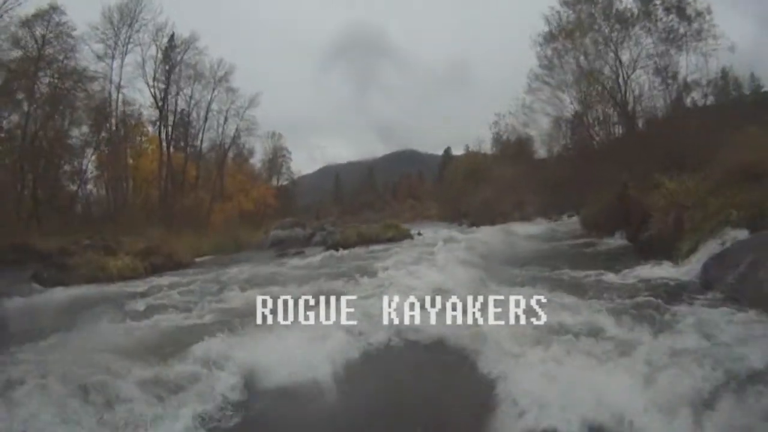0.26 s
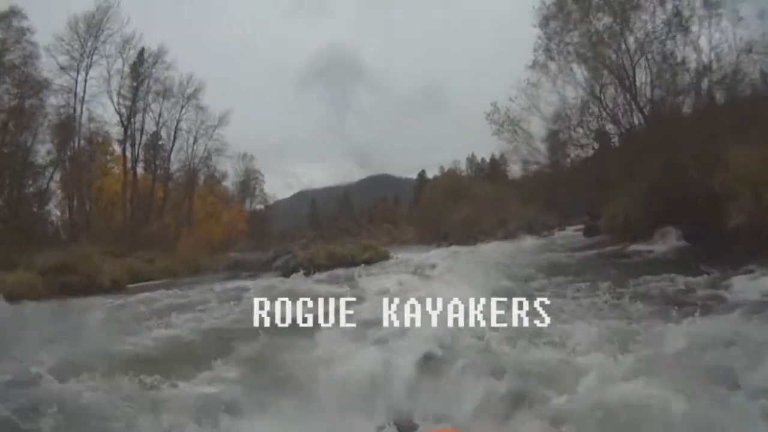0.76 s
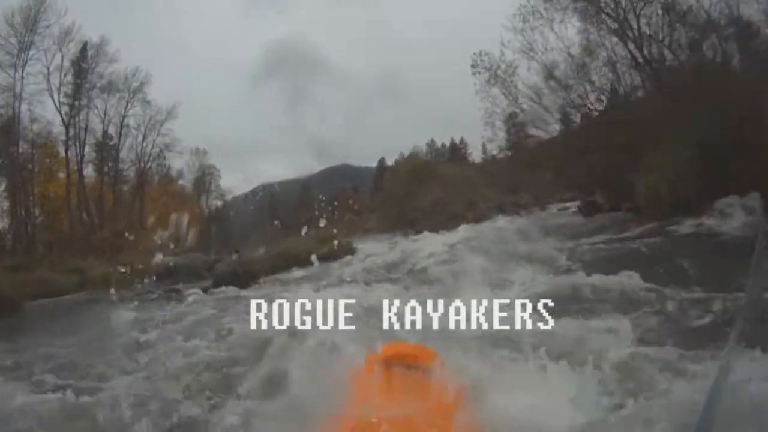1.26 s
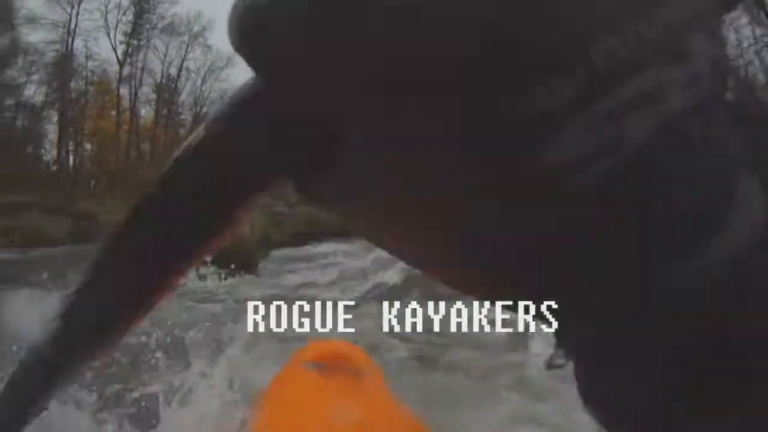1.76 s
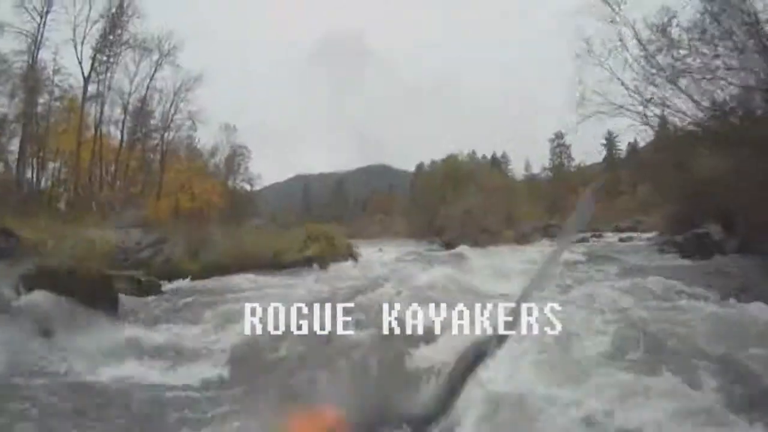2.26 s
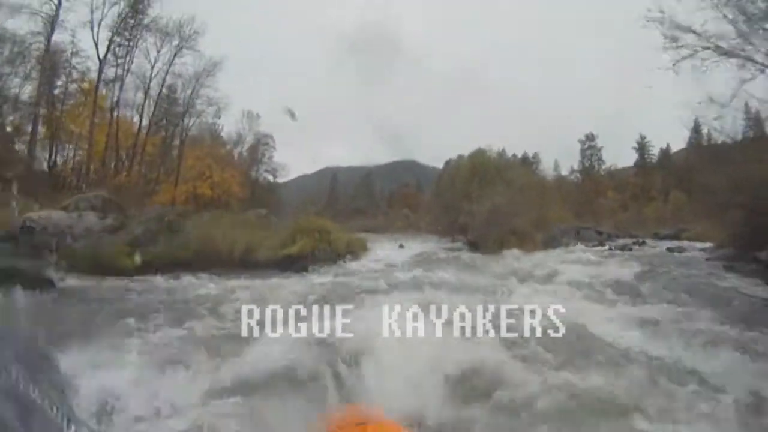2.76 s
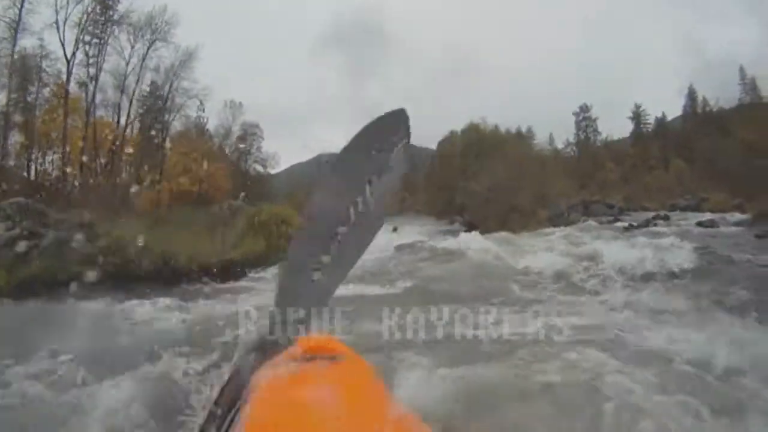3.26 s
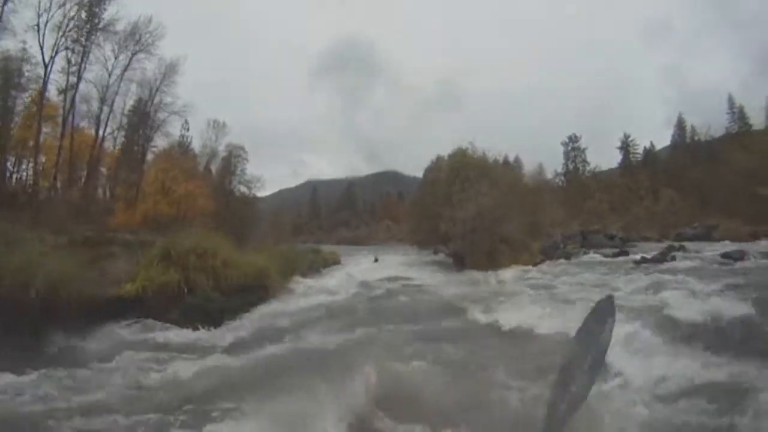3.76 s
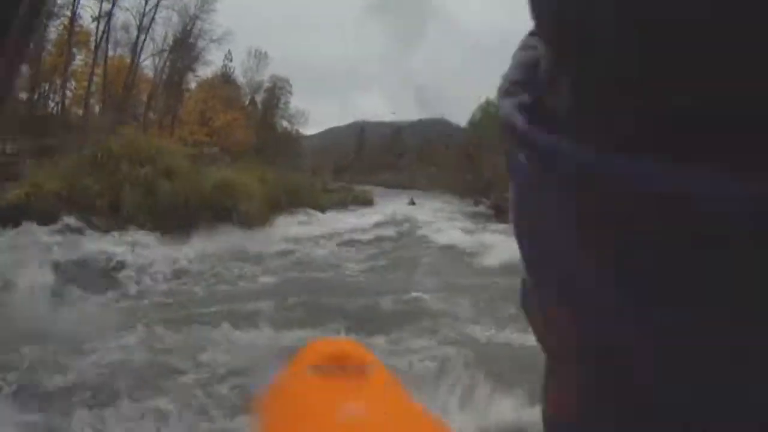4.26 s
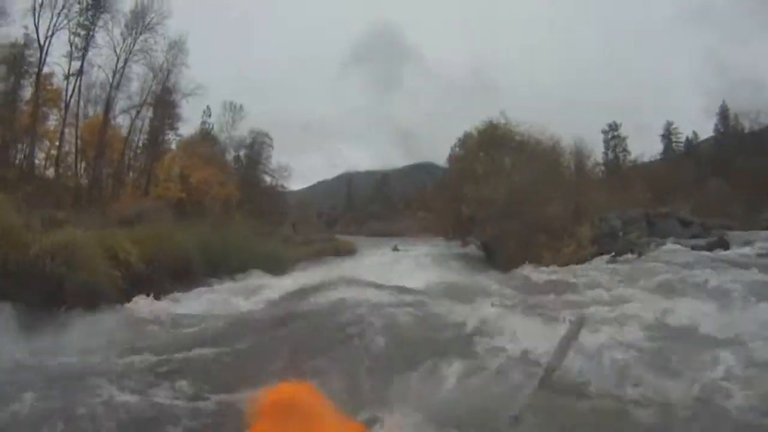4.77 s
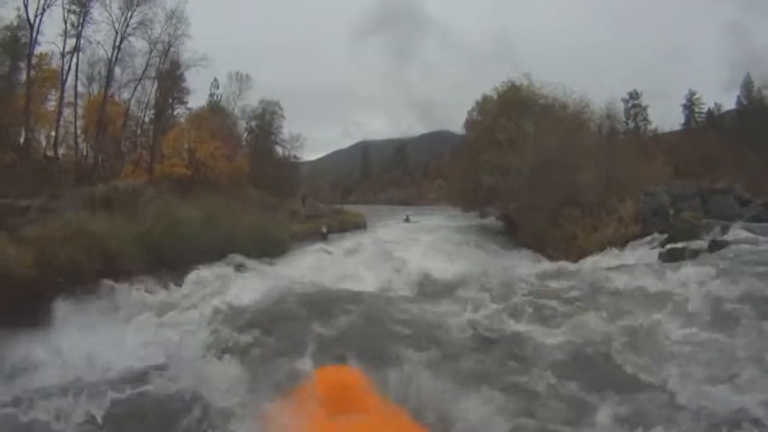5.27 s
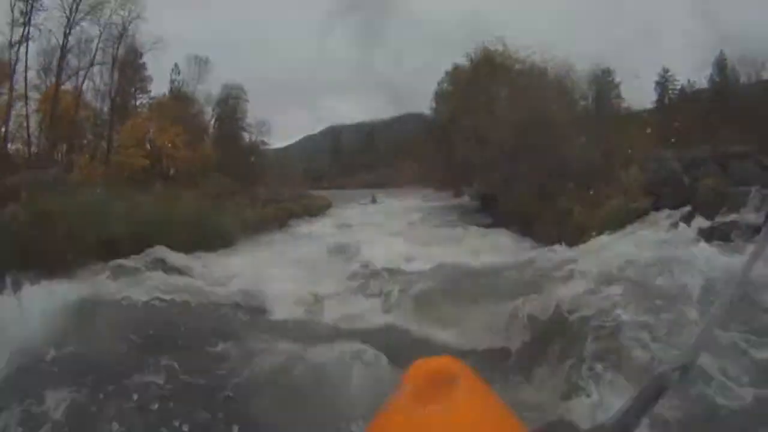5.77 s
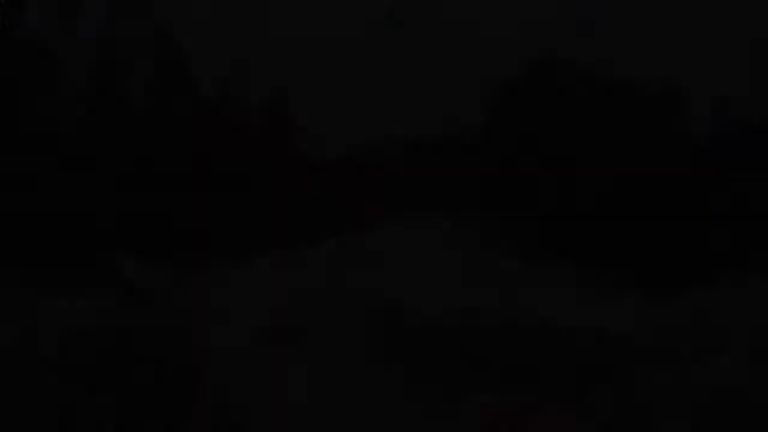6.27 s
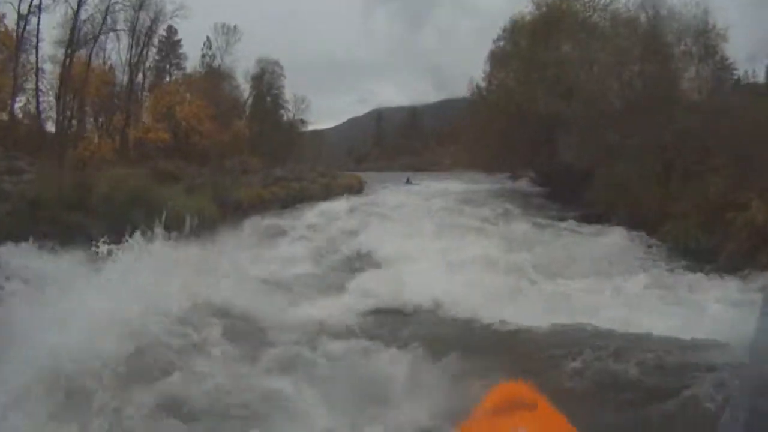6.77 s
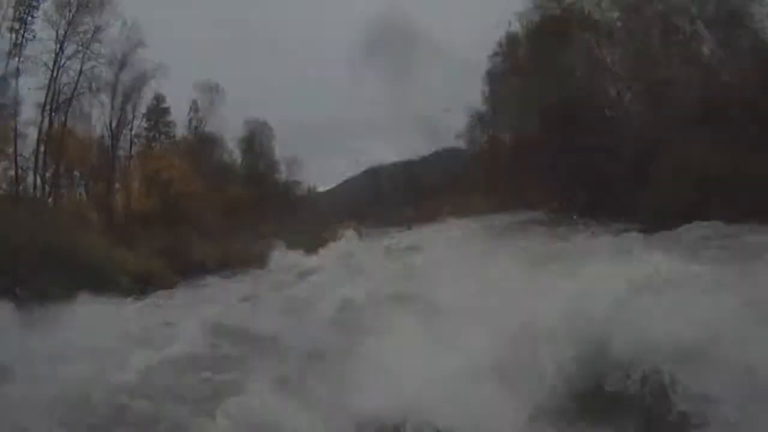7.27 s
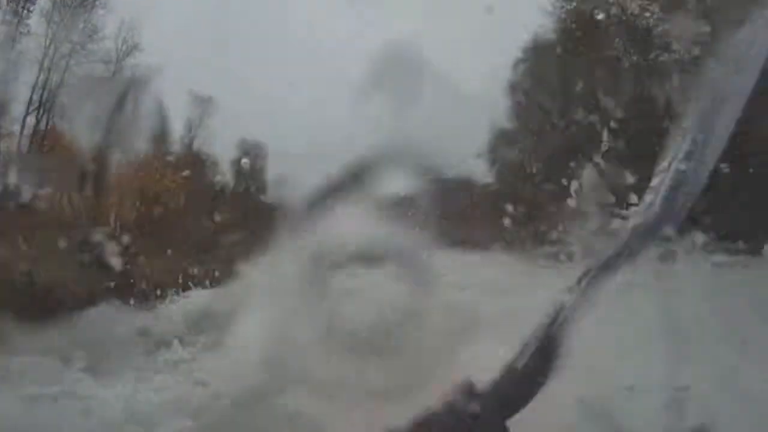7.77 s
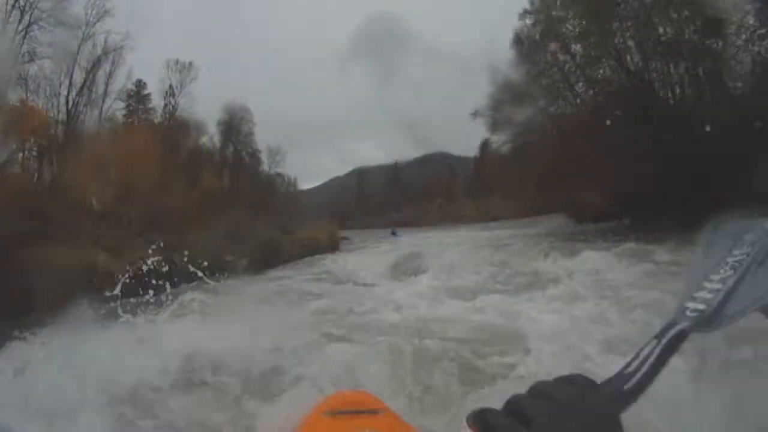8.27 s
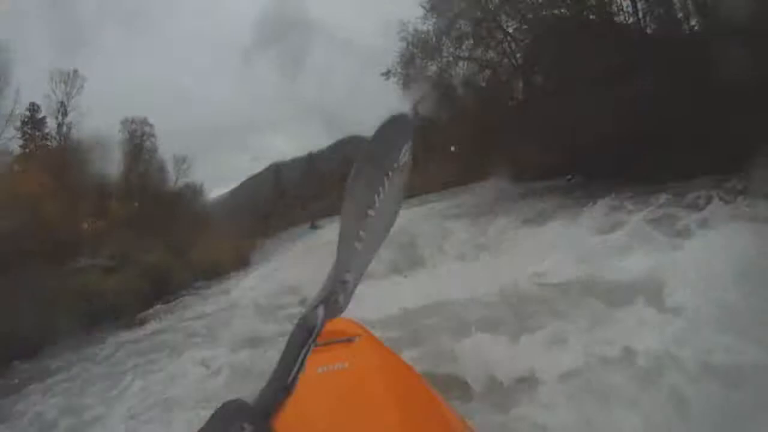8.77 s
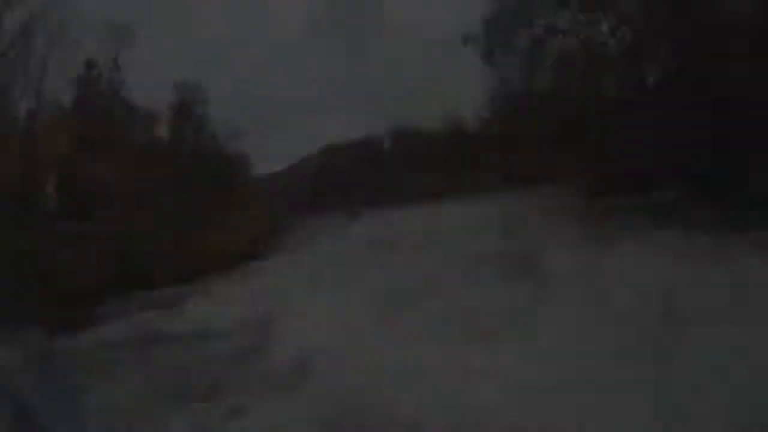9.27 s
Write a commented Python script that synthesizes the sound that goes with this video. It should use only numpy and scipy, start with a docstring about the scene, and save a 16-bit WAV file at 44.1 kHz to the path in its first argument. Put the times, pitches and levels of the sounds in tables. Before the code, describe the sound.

Close on-board sound of a kayak running a rapid, heard through a waterproof camera case that makes the foam boxy and midrange. Steady rushing water and low hull rumble carry brief splashes, gurgles and sinking gulps. The sound fades away, returns for a stronger wave ending in sharp drop taps, cuts, then swells back with spray, knocks and two hard low thumps before stopping.

```python
"""A kayak runs a whitewater rapid, heard on board by a microphone in a waterproof camera case.
Foam hisses as case-filtered noise and tiny rings; churning is shaped noise with larger bubble rings.
Splashes hiss and gurgle, air pockets boom with sinking pitch, waves thump the hollow hull and knocks ring it.
Spray and heavy drops tap the case, whose resonances colour them and the foam.
Three stretches of river fade in and out."""
import sys
import numpy as np
from scipy import signal
from scipy.fft import rfft, irfft, next_fast_len
from scipy.io import wavfile
from scipy.ndimage import uniform_filter1d, map_coordinates

SR = 44100
rng = np.random.default_rng(int(sys.argv[2]) if len(sys.argv) > 2 else 0)


def transcribe(signal):
    """Save signal, clipped to [-1, 1], as a 16-bit WAV file at the path in sys.argv[1]."""
    frames = np.atleast_2d(signal).T
    limited = np.clip(frames, -1, 1)
    pcm = np.round(limited * 32767).astype(np.int16)
    wavfile.write(sys.argv[1], SR, pcm)


N = 420273
TOP_HZ = 15250  # upper band limit of the microphone

# The three stretches of river. Each row: start in seconds, fade-in in seconds, end in seconds,
# fade-out in seconds.
STRETCH_FADES = [(-.1, .05, 6.396, .84), (6.465, 0.39, 7.609, .005), (7.692, 0.45, 9.6, .05)]


def amp(db):
    """Decibels to gain."""
    return 10 ** (np.asarray(db) / 20)


def unit(x):
    """Scaled to rms 1."""
    return x / np.sqrt(np.mean(x ** 2) + 1e-20)


def add(track, s, sound):
    """Mix a sound into a track at time s in seconds."""
    part = track[max(round(s * SR), 0):][:len(sound)]
    part += sound[:len(part)]


def wobble(rate):
    """A smooth random curve through rate random points a second."""
    points = rng.standard_normal(int(N * rate / SR) + 4)
    return map_coordinates(points, [np.arange(N) * rate / SR])


def filtered(x, response):
    """x with its spectrum multiplied by a response of frequency in Hz."""
    size = next_fast_len(N + 8192)
    spectrum = rfft(x, size) * response(np.fft.rfftfreq(size, 1 / SR))
    return irfft(spectrum, size)[:N]


def coloured(x, points):
    """x shaped by (Hz, dB) points joined along log frequency, at rms 1."""
    hz, db = np.transpose(points)
    return unit(filtered(x, lambda f: amp(np.interp(np.log(f + 1), np.log(hz), db))))


def patchy_noise(patchy_db):
    """Noise whose level drifts in patches of time and frequency, at rms 1."""
    spectrogram = signal.stft(rng.standard_normal(N), nperseg=512)[2]
    field = rng.standard_normal(spectrogram.shape)
    field = uniform_filter1d(field, size=9, axis=0)  # across frequency
    field = uniform_filter1d(field, size=14, axis=1)  # along time
    noise = signal.istft(spectrogram * amp(patchy_db * unit(field)), nperseg=512)[1]
    return unit(noise[:N])


def bubbles(per_second, centre_hz, spread, cycles, scatter_db, size=256):
    """A cloud of tiny rings, random in pitch and strength, each losing 60 dB in some cycles; rms 1."""
    count = int(per_second * N / SR)
    start = rng.integers(0, N, (count, 1))
    hz = np.minimum(centre_hz * np.exp(spread * rng.standard_normal((count, 1))), TOP_HZ)
    strength = amp(scatter_db * np.minimum(rng.exponential(size=(count, 1)), 6))
    turns = hz * np.arange(size) / SR
    decay = amp(-60 * turns / cycles)
    rings = strength * np.sin(2 * np.pi * turns) * decay * np.sqrt(hz)
    places = start + np.arange(size)
    return unit(np.bincount(places.ravel(), rings.ravel(), N)[:N])


def case_response(size=2048):
    """Causal impulse response of the case wall: steep resonances over a faint leak."""
    # Each row: resonance in Hz, width in Hz where it is 9 dB down, level in dB.
    resonances = [(955, 1320, -11.5), (1280, 350, -4.5), (2020, 337, -2), (2350, 895, -0.02),
                  (3497, 410, -6.5), (3677, 1280, -8.5), (4674, 1970, -12.5), (6530, 360, -17),
                  (7286, 1320, -15), (8370, 1170, -12.5), (9560, 570, -10.5), (9940, 380, -12),
                  (10695, 1030, -23), (13470, 980, -21), (14170, 440, -17), (14430, 710, -13.5)]
    f = np.fft.rfftfreq(size, 1 / SR)
    power = sum(amp(db) ** 2 / (1 + (2 * (f - hz) / width) ** 2) ** 3 for hz, width, db in resonances)
    leak = amp(-49) ** 2
    # folding the cepstrum gives minimum phase: the wall answers only after it is struck
    cepstrum = irfft(np.log(power + leak) / 2)
    cepstrum[1:size // 2] *= 2
    cepstrum[size // 2 + 1:] = 0
    return irfft(np.exp(rfft(cepstrum)))


def current():
    """Gains of hiss, churning and rumble; each stretch of river has its own strengths of water."""
    # Strength of the water. Each row: time in seconds, then foam hiss, churning and hull rumble
    # in dB before the trims of the mix.
    upper_rapid = [(0.0, -52, -64, -70), (0.23, -48, -62.5, -67.5), (0.62, -45, -59.5, -63.5),
                   (1.0, -46.5, -60, -63), (1.47, -49.5, -64.5, -57.5), (1.73, -50, -61.5, -59),
                   (2.9, -48.5, -62.5, -57.5), (3.13, -47, -63, -51.5), (3.73, -50, -63.5, -62),
                   (3.96, -49, -62, -58.5), (4.2, -48.5, -58.5, -50.5), (4.43, -49, -62.5, -53),
                   (5.1, -55, -66.5, -62.5), (5.45, -57, -66.5, -64)]
    big_wave = [(6.82, -45, -57, -54), (6.952, -44.5, -56.5, -48.5), (7.422, -43, -55, -54),
                (7.47, -47.5, -56.5, -59.5)]
    lower_rapid = [(8.18, -47.5, -60, -52), (8.392, -45.5, -59.5, -47.5), (9.004, -50, -58.5, -49.5),
                   (9.22, -51.5, -60.5, -52), (9.378, -51, -65, -55.5), (9.52, -57, -67, -64)]
    t, levels = np.arange(N) / SR, np.zeros((3, N))
    for (start, *_), stretch in zip(STRETCH_FADES, (upper_rapid, big_wave, lower_rapid)):
        s, *columns = np.transpose(stretch)
        levels = np.where(t >= start, [np.interp(t, s, db) for db in columns], levels)
    return amp(levels)


def foam(gain, case):
    """The roar of countless far bubbles, with nearer ones fizzing on top, heard through the case."""
    roar = patchy_noise(patchy_db=1.05)
    fizz = bubbles(per_second=1400, centre_hz=5500, spread=0.71, cycles=3.6, scatter_db=3.5)
    surge = amp(0.13 * wobble(8.4) + 0.6 * wobble(50))
    through_case = signal.fftconvolve(roar + amp(-11.5) * fizz, case)[:N]
    return gain * surge * unit(through_case)


def churn(gain):
    """Larger bubbles tumble and ring in the water round the boat, over a low wash of noise."""
    # Water churning against the boat. Each row: frequency in Hz, relative density in dB per Hz.
    churn_colour = [(30, -15.5), (70, -4), (130, 0), (200, 0.5), (300, 1), (500, -4), (700, -15),
                    (1000, -20), (1600, -31.5), (4000, -103)]
    tumble = bubbles(per_second=150, centre_hz=372, spread=0.53, cycles=7.5, scatter_db=2.0, size=2048)
    wash = coloured(patchy_noise(patchy_db=0.5), churn_colour)
    return gain * amp(1.2 * wobble(20)) * unit(wash + amp(-7.5) * tumble)


def hull(gain):
    """Chop keeps the hull rumbling; a wave slap is one short push followed by its lowest mode."""
    # Rumble of the hull. Each row: frequency in Hz, relative density in dB per Hz.
    rumble_colour = [(8, -27.5), (20, -8), (32, -5.5), (42, -2.5), (54, -9), (75, -16.5), (120, -22),
                     (250, -41), (800, -100)]
    # Waves slapping the hull. Each row: time in seconds, level in dB, time in seconds to ring down 60 dB.
    thumps = [(2.05, -41.5, 0.16), (3.157, -36, 0.23), (3.556, -39, .28), (4.472, -36.5, .15),
              (4.622, -39, .2), (5.485, -43.5, .18), (6.992, -28.5, 0.18), (8.488, -35, .17),
              (8.546, -29.5, .33), (8.90, -37, .22), (9.0622, -20, .084), (9.130, -20.5, 0.31)]
    hull_hz = 40.8  # lowest mode
    out = amp(2.5) * gain * coloured(rng.standard_normal(N), rumble_colour)
    t = np.arange(-SR // 20, SR // 2) / SR  # the push begins before the time of the slap
    after = np.maximum(t, 0)
    u = (t / 0.0045) ** 2
    push = (u - 1) / (1 + u) ** 2 * np.exp(-(t / 0.03) ** 2)
    for s, db, t60 in thumps:
        decay = amp(-60 * after / t60) * (1 - np.exp(-after / 0.0054))
        ring = -np.cos(2 * np.pi * hull_hz * t) * decay
        add(out, s + t[0], amp(db) * (push + 0.64 * ring))
    return out


def tap(hz, splatter_db, case):
    """One drop, of peak 1: it rings the case for a few cycles and splatters across it for milliseconds."""
    t = np.arange(SR // 30) / SR
    ring = np.sin(2 * np.pi * hz * t) * amp(-60 * t * hz / 12) * (1 - np.exp(-t / 0.00071))
    burst = np.exp(-((t - 0.0012) / 0.0014) ** 2)
    tail = amp(-25.0) * amp(-60 * t / 0.019)
    splatter = rng.standard_normal(len(t)) * (burst + tail)
    splatter = signal.lfilter(*signal.butter(1, [1500, 14000], "bandpass", fs=SR), splatter)
    ring, splatter = (unit(signal.fftconvolve(part, case)[:len(t)]) for part in (ring, splatter))
    both = ring + amp(splatter_db + 16.5) * splatter
    return both / np.abs(both).max()


def patter(gain, case):
    """Fine spray lands on the case at random, its level following the hiss."""
    # Spray in the air. Each row: time in seconds, small drops per second.
    spray_rate = [(0, 2), (6.6, 3), (7.3, 6), (7.5, 50), (8.3, 28), (9.5, 8)]
    out = np.zeros(N)
    rate = np.interp(np.arange(N) / SR, *np.transpose(spray_rate))
    landings = np.flatnonzero(rng.random(N) < rate / SR)
    for at, (size, pitch, wetness) in zip(landings, rng.uniform(-1, 1, (len(landings), 3))):
        drop = tap(2200 * np.exp(0.6 * pitch), -14 + 8 * wetness, case)
        add(out, at / SR, amp(4.6 * size) * drop)
    return gain * out


def splashes():
    """Gains of splash hiss and gurgle: each splash swells quickly and ebbs more slowly."""
    # Splashes thrown up by blade and bow. Each row: start in seconds, length in seconds,
    # hiss in dB, gurgle in dB against the hiss.
    splash_rows = [(1.208, 0.18, -50, -1.5), (1.42, 0.093, -47.5, -15), (2.879, 0.15, -48, -1.5),
                   (3.218, 0.28, -48.5, -17), (4.095, .2, -48, -5), (4.583, 0.1, -48.5, -13),
                   (6.767, 0.11, -48, -10), (7.199, 0.13, -44.5, -12.5), (7.819, 0.11, -44, -12),
                   (8.15, .11, -47, -8), (8.61, .09, -42.5, -18)]
    rise_share = 0.29  # share of a splash spent swelling
    hiss_gain, gurgle_gain = np.zeros((2, N))
    for s, length, db, gurgle_db in splash_rows:
        u = np.linspace(0, 1, int(length * SR))
        swell = amp(db) * np.sqrt(np.interp(u, [0, rise_share, 1], [0, 1, 0]))
        add(hiss_gain, s, swell)
        add(gurgle_gain, s, swell * amp(gurgle_db))
    return hiss_gain, gurgle_gain


def gurgle(gain):
    """Air trapped by a splash rings as bubbles of nearly one size."""
    return gain * bubbles(per_second=600, centre_hz=1303, spread=0.1, cycles=24, scatter_db=-0.5, size=768)


def gulps():
    """Each air pocket booms with a wavering, settling pitch and a weak octave, while water slops round it."""
    # Air pockets pulled under by blade and bow. Each row: start in seconds, length in seconds,
    # first pitch in Hz, level in dB before the swell.
    pockets = [(1.215, 0.14, 141, -43.5), (2.885, 0.14, 144.6, -40.5), (4.135, 0.14, 105, -35.5),
               (4.279, 0.11, 70, -42), (4.745, .086, 81.4, -40.5), (5.637, .087, 76, -42),
               (5.642, 0.062, 175, -47.5), (6.773, 0.065, 136, -36), (7.895, .06, 178, -41.5),
               (8.14, 0.045, 134, -42), (8.589, .04, 310, -44), (8.61, 0.059, 96.5, -40)]
    # Water slopping round a pocket. Each row: frequency in Hz, relative density in dB per Hz.
    slop_colour = [(40, 5), (140, 4), (260, -9), (500, -23), (900, -19.5), (1350, -13.5), (1750, -18),
                   (3000, -44.5), (8000, -90)]
    settled_hz, settle_s = 46.8, 0.0833  # every pocket's pitch sinks toward the same low note
    out, slop_gain = np.zeros((2, N))
    for s, length, first_hz, db in pockets:
        u = np.linspace(0, 1, int(length * SR))
        waver = map_coordinates(rng.standard_normal(8), [7 * u], mode="nearest")
        hz = settled_hz + (first_hz - settled_hz) * np.exp(-u * length / settle_s)
        phase = 2 * np.pi * np.cumsum(hz * (1 + 0.032 * waver)) / SR
        swell = amp(db) * np.sqrt(np.abs(np.sin(np.pi * u))) * amp(-3 * u)
        add(out, s, swell * (np.sin(phase) + amp(-14.5) * np.sin(2 * phase)))
        add(slop_gain, s, swell)
    return out + amp(-11.5) * slop_gain * coloured(rng.standard_normal(N), slop_colour)


def drops(case):
    """Heavy drops of a breaking wave strike the case, each with its own pitch and splatter."""
    # Each row: time in seconds, peak in dB before the trim of the mix, pitch in Hz,
    # splatter in dB before the trim inside tap().
    heavy_drops = [(2.0467, -29.5, 2000, -22), (2.0577, -34.5, 2000, -25), (3.021, -25, 2100, -18),
                   (4.6198, -34, 2530, -14), (6.0202, -36, 2130, -21), (7.4195, -13, 2400, -11),
                   (7.4274, -25.5, 3700, -16), (7.451, -18.5, 2330, -6.5), (7.4749, -20.5, 2320, -13),
                   (7.5203, -22.5, 2410, -9.5), (7.5408, -23.5, 2370, -13), (7.5682, -27.5, 2450, -3),
                   (7.6006, -36, 2370, -13), (7.7528, -29, 2350, -24), (7.8441, -22, 2370, -12),
                   (7.87, -21.5, 2440, -16), (8.2487, -31, 1980, -21), (8.3, -35, 1980, -27),
                   (8.5325, -30, 2020, -12), (9.3222, -33, 2220, -3)]
    out = np.zeros(N)
    for s, db, hz, splatter_db in heavy_drops:
        add(out, s, amp(db) * tap(hz, splatter_db, case))
    return out


def knocks():
    """The plastic answers a knock with a few cycles, a weaker upper mode and a brief low thud."""
    # Dull knocks of water and paddle on the boat. Each row: time in seconds, peak in dB,
    # pitch in Hz, thud in dB against the main mode.
    knock_rows = [(3.0205, -29, 1300, -20), (3.0305, -31, 1200, -16), (3.081, -38, 1040, -14),
                  (4.654, -41, 860, -9), (5.301, -41, 1120, -16), (5.475, -30.5, 1070, -19),
                  (6.231, -37, 880, -15.5), (7.061, -23.5, 1080, -11), (7.376, -31, 1100, -8),
                  (7.420, -24.5, 924, -2.5), (7.451, -23, 1270, -11), (7.568, -25.5, 1100, -4.5),
                  (7.785, -28.5, 1160, -3), (7.870, -27, 1320, -16), (8.059, -35, 1150, 0),
                  (8.300, -33, 1200, -9), (8.396, -35, 1370, -18), (8.532, -29.5, 1170, -6),
                  (8.780, -36, 1195, -16), (8.882, -33.5, 1100, -10), (9.152, -29, 1040, -14),
                  (9.322, -35.5, 1050, 1.5), (9.472, -40, 1113, -18)]
    out, t = np.zeros(N), np.arange(SR // 30) / SR
    envelope = (1 - np.exp(-(t / 0.00073) ** 2)) * amp(-60 * t / 0.0059)
    for s, db, hz, thud_db in knock_rows:
        main = np.sin(2 * np.pi * hz * t)
        upper = amp(-7) * np.sin(2 * np.pi * (2150 * t + rng.random()))
        thud = amp(thud_db) * np.sin(2 * np.pi * 380 * t)
        knock = (main + upper + thud) * envelope
        add(out, s, amp(db) * knock / np.abs(knock).max())
    return out


def scene():
    """River, boat and spray together, on one channel."""
    hiss_gain, churn_gain, rumble_gain = current()
    splash_gain, gurgle_gain = splashes()
    case = case_response()
    # river and splash are independent noises, so their powers add
    hiss = foam(np.hypot(amp(0.6) * hiss_gain, splash_gain), case)
    body = churn(np.hypot(amp(-0.46) * churn_gain, amp(-16) * splash_gain))
    chop = amp(0.8 + 1.5 * wobble(9))  # uneven shaking of the hull
    boat = hull(chop * rumble_gain) + gulps() + knocks()
    spray = amp(-0.3) * drops(case) + amp(10.0) * patter(hiss_gain, case)
    return (hiss + body + gurgle(gurgle_gain) + boat + spray)[None]


def fades():
    """Gain that fades every stretch in and out along straight lines, over a faint remainder."""
    t = np.arange(N) / SR
    stretches = [np.clip(np.minimum((t - start) / rise, (end - t) / fall), 0, 1)
                 for start, rise, end, fall in STRETCH_FADES]
    return amp(-46.5) + sum(stretches)


def record(dry):
    """The stretches fade in and out; the microphone keeps nothing from its band limit up."""
    return np.array([filtered(channel * fades(), lambda hz: hz < TOP_HZ) for channel in dry])


dry = scene()
out = record(dry)
transcribe(out)
```